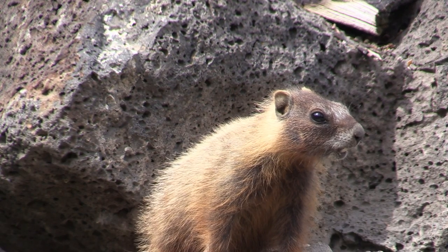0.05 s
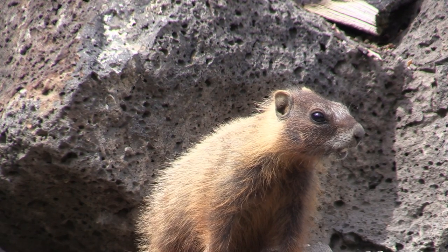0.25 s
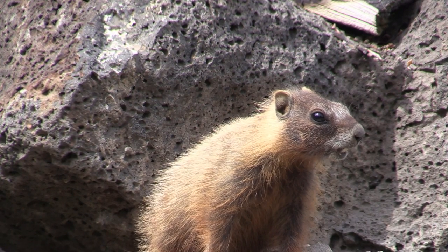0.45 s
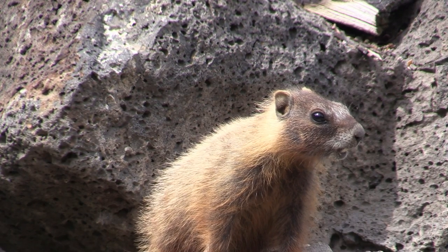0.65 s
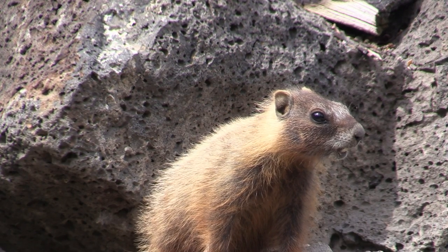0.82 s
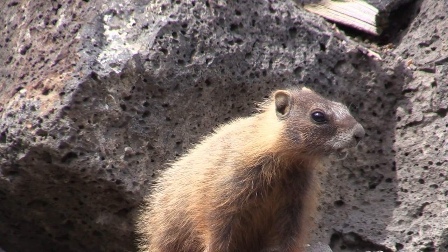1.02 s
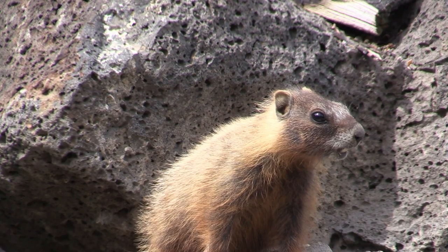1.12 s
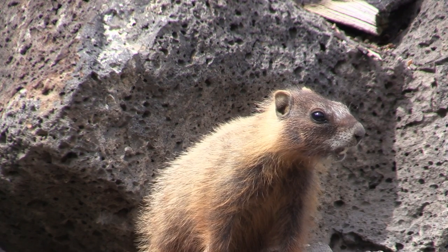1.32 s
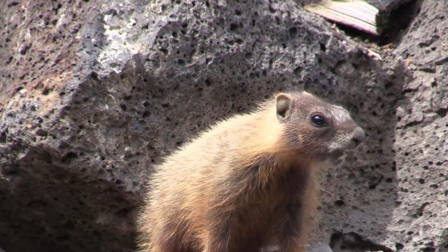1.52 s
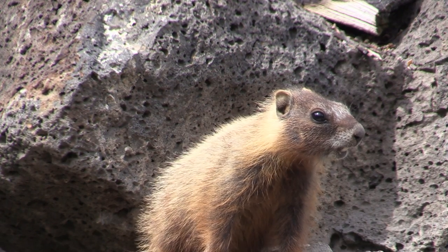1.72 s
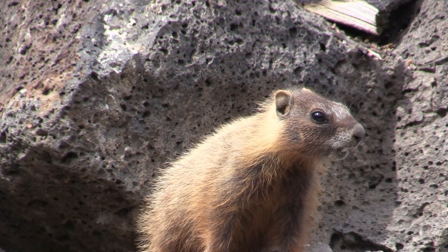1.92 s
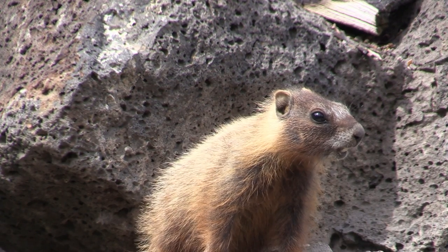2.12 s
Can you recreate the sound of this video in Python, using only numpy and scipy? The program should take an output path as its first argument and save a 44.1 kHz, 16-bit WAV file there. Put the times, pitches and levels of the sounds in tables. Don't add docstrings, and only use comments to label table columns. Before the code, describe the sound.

A small rodent's alarm chirp is the main sound: at about 1.68 s one loud, piercing whistle near 4 kHz, barely 0.04 s long, plunges in pitch, bounces off near rocks and fades until 2.1 s. Earlier, wind rumbles in lumps, strongest around 0.3 and 1.1-1.4 s; faint birds twitter until 1 s over a thin motor whine. Left side only; right faintly hisses.

```python
import sys
import numpy as np
from scipy import signal
from scipy.fft import rfft, irfft
from scipy.io import wavfile

SR = 44100
rng = np.random.default_rng(int(sys.argv[2]) if len(sys.argv) > 2 else 0)


def unload_wav(signal):
    wavfile.write(
        sys.argv[1],
        SR,
        np.round(np.clip(np.atleast_2d(signal).T, -1, 1) * 32767).astype(np.int16),
    )


def voltage_ratio(decibels):
    exponent = np.asarray(decibels, float) / 20
    return 10 ** exponent


N = 94815


def in_time(rows):
    return np.interp(np.arange(N) / SR, *np.transpose(rows))


def rms_one(x):
    return x / np.sqrt(np.mean(x ** 2) + 1e-20)


def band_pass(x, order, low_hz, high_hz):
    return signal.sosfilt(signal.butter(order, [low_hz, high_hz], "band", fs=SR, output="sos"), x)


def low_pass(x, order, top_hz):
    return signal.sosfilt(signal.butter(order, top_hz, fs=SR, output="sos"), x)


def coloured(spectrum, slope_db=0.):
    at, db = np.transpose(spectrum)
    hz = np.maximum(np.arange(N // 2 + 1) * SR / N, 1)
    octaves_outside = np.maximum(np.log2(hz / at[-1]), 0) + np.maximum(np.log2(at[0] / hz), 0)
    shape = np.interp(np.log(hz), np.log(at), db) - slope_db * octaves_outside
    return rms_one(irfft(rfft(rng.standard_normal(N)) * voltage_ratio(shape), N))


def drift(rate_hz):
    slow = signal.butter(1, rate_hz, fs=SR, output="sos")
    return rms_one(signal.sosfiltfilt(slow, rng.standard_normal(3 * N))[N:2 * N])


def idle_hiss():
    # (frequency [Hz], density [dB per Hz])
    hiss_colour = [(15, 11), (50, -13.5), (120, -2), (600, 1), (3000, 0.8), (16000, 0)]
    return voltage_ratio(-58.5) * coloured(hiss_colour)


def still_air():
    # (frequency [Hz], density [dB per Hz])
    air_colour = [(300, -2), (600, -4.5), (1100, -9.5), (2000, -16), (5000, -15.5), (8000, -25.5),
                  (12000, -47.5), (16000, -56)]
    return voltage_ratio(-59.5 + 1.2 * drift(3.2)) * coloured(air_colour, slope_db=12)


def motor_whine():
    # (frequency [Hz], level [dB])
    lines = [(720, -57.5), (840, -70), (960, -76), (1440, -66)]
    # (time [s], level [dB])
    load_swell = [(0, -0.5), (.35, -5), (.9, -5), (1.6, 1.5), (2.15, 2.5)]
    t = np.arange(N) / SR
    swell_db = in_time(load_swell)
    out = np.zeros(N)
    for i, (hz, db) in enumerate(lines):
        level_db = db + 1.5 * drift(1.0)
        if i == 0:
            level_db = level_db + swell_db
        out += voltage_ratio(level_db) * np.sin(2 * np.pi * (hz * t + rng.random()))
    return out


def gliding_birds():
    # (time [s], length [s], start pitch [Hz], end pitch [Hz], level [dB])
    high_bird = [
        (0.0, 0.087, 4750, 3980, -62.5),
        (0.406, .045, 6050, 5600, -65),
        (0.532, 0.047, 6050, 5450, -62),
        (0.627, 0.053, 4130, 5200, -57.5),
        (0.711, .05, 5030, 4010, -61),
        (.82, 0.056, 3840, 5440, -60),
        (0.921, 0.031, 4500, 3940, -64),
    ]
    # (time [s], length [s], start pitch [Hz], end pitch [Hz], level [dB])
    low_bird = [
        (0.0, 0.014, 2390, 2320, -56),
        (.03, 0.042, 2070, 2240, -59),
        (.05, .035, 2370, 2390, -58),
        (.092, 0.048, 2090, 2235, -52.5),
        (.115, .025, 2260, 2280, -61),
        (0.152, 0.043, 2063, 2260, -57),
    ]
    out = np.zeros(N)
    for start_s, length_s, from_hz, to_hz, db in high_bird + low_bird:
        u = np.linspace(0, 1, int(length_s * SR))
        phase = 2 * np.pi * np.cumsum(from_hz + (to_hz - from_hz) * u) / SR
        first = int(start_s * SR)
        out[first:first + len(u)] += voltage_ratio(db) * np.sin(np.pi * u) ** .5 * np.sin(phase)
    return out


def blurred_call():
    # (centre [Hz], width [Hz], level [dB])
    call_bands = [(2155, 78, -1), (2330, 160, -1.5)]
    # (time [s], level [dB])
    call_level = [(0, -70), (.1, -63), (.185, -63), (.25, -69.5), (.4, -67), (.62, -74.5), (.8, -100)]
    out = np.zeros(N)
    for hz, width_hz, db in call_bands:
        noise = rng.standard_normal(N)
        out += voltage_ratio(db) * rms_one(band_pass(noise, 2, hz - width_hz / 2, hz + width_hz / 2))
    return voltage_ratio(in_time(call_level)) * out


def wind():
    # (time [s], level [dB])
    gusts = [(0.03, -35), (0.16, -34), (0.32, -26), (0.35, -33), (0.91, -32), (1.1, -26), (1.16, -31),
             (1.23, -28.5), (1.28, -34), (1.35, -27.5), (1.42, -34.5), (1.48, -30), (1.5, -36.5),
             (1.98, -48), (2.12, -42.5), (2.15, -45)]
    # (frequency [Hz], density [dB per Hz])
    wind_colour = [(12, -12), (20, -2), (54, 3), (108, -5.5), (212, -22), (432, -48), (507, -47.5),
                   (650, -59.5), (840, -83), (1430, -120)]
    return voltage_ratio(7 + in_time(gusts) + 1.05 * drift(6.1)) * coloured(wind_colour, slope_db=25)


def chirp():
    # (time [s], frequency [Hz])
    pitch = [
        (1.6755, 4050),
        (1.680, 4150),
        (1.685, 4270),
        (1.691, 4230),
        (1.6985, 4030),
        (1.7025, 3600),
        (1.708, 2950),
        (1.713, 2350),
        (1.718, 1700),
    ]
    # (time [s], level [dB])
    effort = [(1.6751, -32), (1.6748, -15), (1.6773, -7.5), (1.6796, 0.5), (1.684, -3), (1.693, 3.5),
              (1.697, -4.5), (1.7025, 3.5), (1.718, -37.5)]
    # (multiple of the pitch, level [dB], share of the effort swing followed)
    overtones = [(2, -15, 0.19), (3, -30.5, 0.2)]
    t = np.arange(N) / SR
    db = in_time(effort)
    phase = 2 * np.pi * np.cumsum(in_time(pitch)) / SR
    edge_s = np.minimum(t - effort[0][0], effort[-1][0] - t)
    on = np.clip(edge_s / 0.0015, 0, 1)
    whistle = voltage_ratio(db) * np.sin(phase)
    for k, level_db, share in overtones:
        whistle += voltage_ratio(level_db + share * db) * np.sin(k * phase)
    breath = voltage_ratio(-33 + 0.2 * db) * band_pass(rng.standard_normal(N), 2, 2200, 13000)
    return on * (whistle + breath)


def hillside(x):
    # (delay [s], level [dB])
    rocks = [
        (.0038, -9.5),
        (.0071, -11),
        (.012, -18),
        (0.017, -28),
    ]
    # (delay [s], spread [s], level [dB])
    slopes = [
        (.085, 0.033, -38),
        (.155, 0.018, -53),
        (.225, .03, -54),
    ]
    # (centre [Hz], width [Hz])
    bright_band = (5800, 1900)
    dull_db, dull_t60_s = -30, 0.73
    bright_db, bright_t60_s = -16, 0.37
    t = np.arange(SR // 2 + SR // 8) / SR
    response = np.zeros(len(t))
    for delay_s, db in [(0.001, 0)] + rocks:
        response[int(delay_s * SR)] = voltage_ratio(db)
    build_up = np.clip(t / 0.0085, 0, 1)
    scatter = rng.standard_normal((2, len(t))) * build_up / np.sqrt(0.027 * SR)
    lumps = sum(voltage_ratio(db) * np.exp(-((t - delay_s) / spread_s) ** 2) for delay_s, spread_s, db in slopes)
    dull = low_pass(scatter[0], 2, 5000)
    hz, width_hz = bright_band
    bright = band_pass(scatter[1], 1, hz - width_hz / 2, hz + width_hz / 2)
    response += dull * (voltage_ratio(dull_db - 60 * t / dull_t60_s) + lumps)
    response += bright * voltage_ratio(bright_db - 60 * t / bright_t60_s)
    return signal.fftconvolve(x, response)[:N]


def scene():
    background = still_air() + motor_whine() + gliding_birds() + blurred_call() + wind()
    heard = background + hillside(chirp())
    return np.array([heard, 0 * heard])


def gain_control(heard, level_source):
    threshold_db, most_db = -14, 9
    attack_s, back_db_per_s = .01, 28
    recovery_db = back_db_per_s * np.arange(N) / SR
    over_db = np.clip(20 * np.log10(np.abs(level_source) + 1e-9) - threshold_db, 0, most_db)
    held_db = np.maximum.accumulate(over_db + recovery_db) - recovery_db
    r = np.exp(-1 / (attack_s * SR))
    return heard * voltage_ratio(-signal.lfilter([1 - r], [1, -r], held_db))


def drop_quiet_bands(x):
    hz, _, z = signal.stft(x, SR, nperseg=2048, noverlap=1024)
    band = (4 * np.log2(1 + hz / 700) ** 1.3).astype(int)
    power = np.abs(z) ** 2 + 1e-20
    level = 10 * np.log10([power[band == b].mean(axis=0) for b in range(band[-1] + 1)])
    bar = 10 * np.log10(power.sum(axis=0)) - 64.5
    bar = bar + 4 * rng.standard_normal(level.shape[1])
    bar = bar + 2.5 * rng.standard_normal(level.shape)
    tilt = -1.5 * np.log2(1 + hz[:, None] / 2000)
    kept = level[band] > bar[band] + tilt
    return signal.istft(z * kept, SR, nperseg=2048, noverlap=1024)[1][:N]


def top_cut(x):
    return signal.sosfilt(signal.butter(12, 15800, fs=SR, output="sos"), x)


def record(dry):
    heard = low_pass(dry[0], 4, 12900)
    left = drop_quiet_bands(gain_control(heard, dry[0]))
    right = idle_hiss() + voltage_ratio(-60) * low_pass(left, 1, 58.4)
    return top_cut(np.array([left, right]))


dry = scene()
out = record(dry)
unload_wav(out)
```